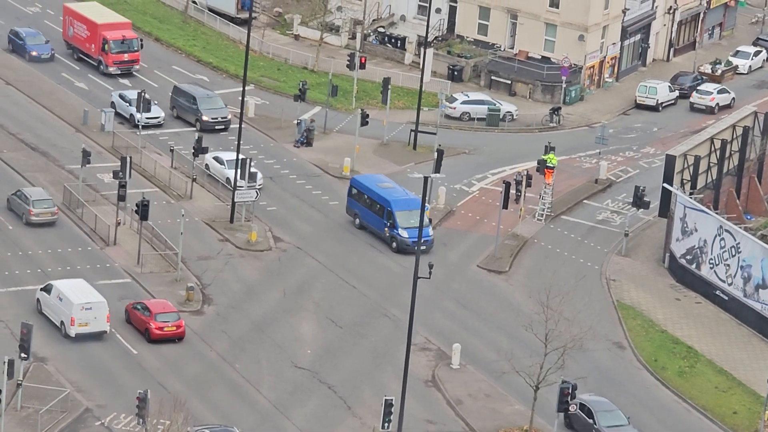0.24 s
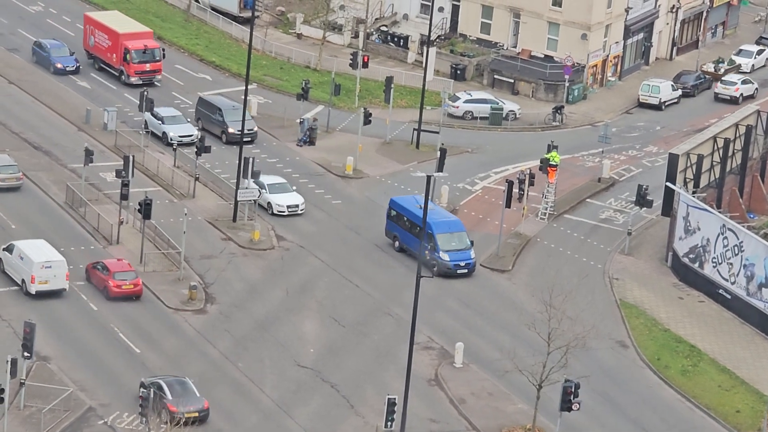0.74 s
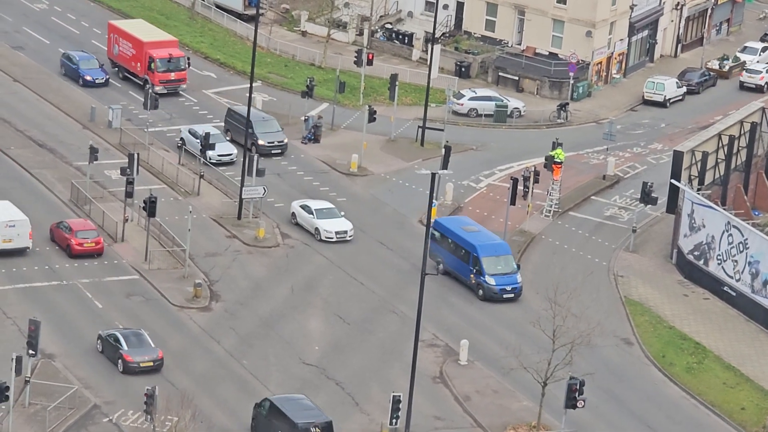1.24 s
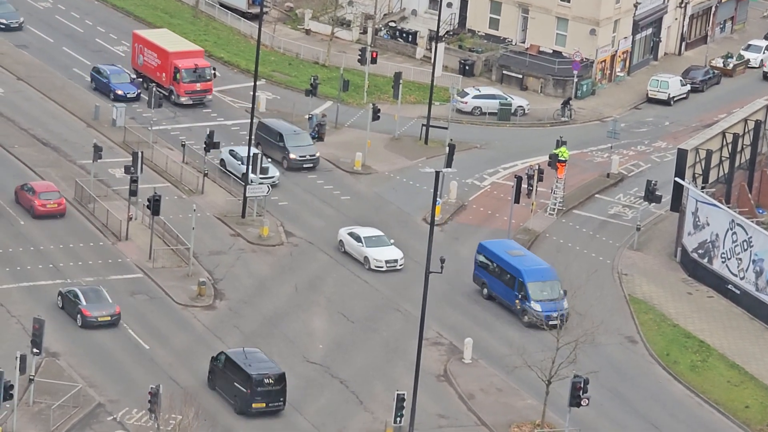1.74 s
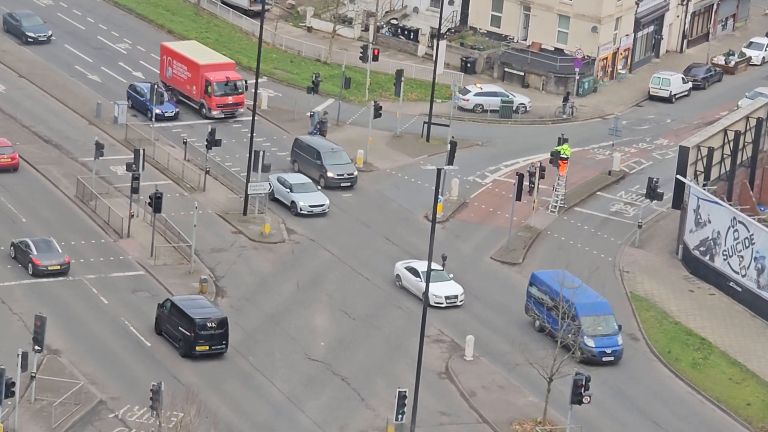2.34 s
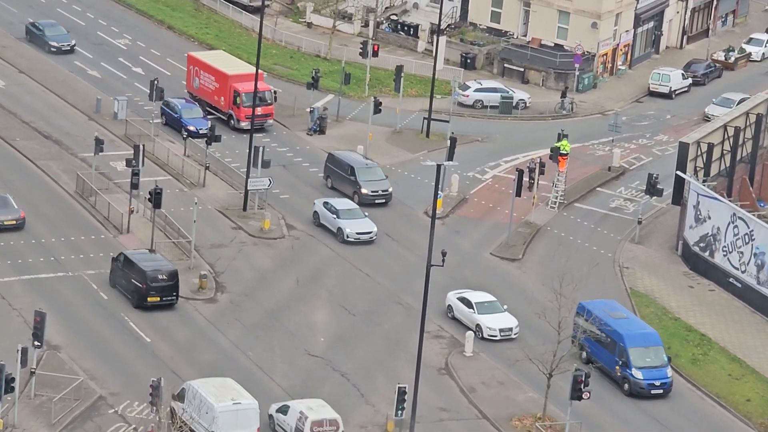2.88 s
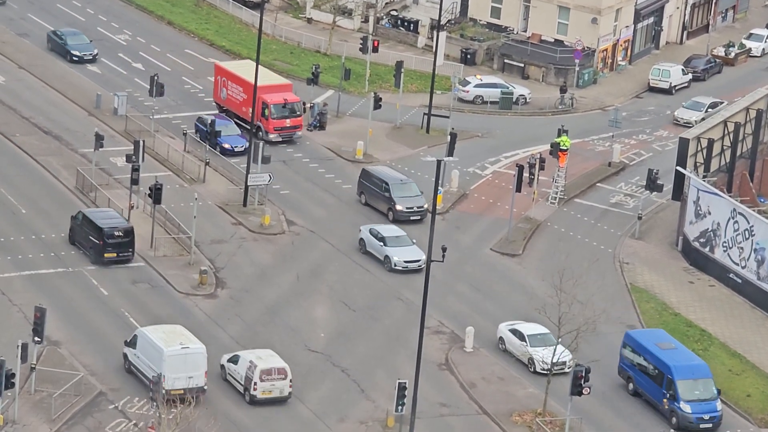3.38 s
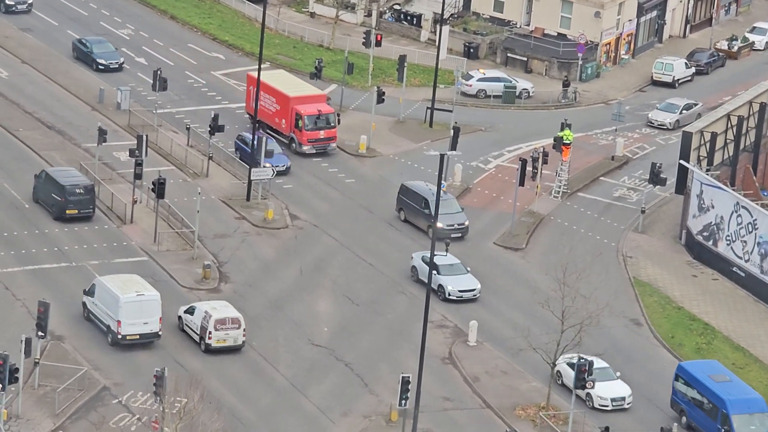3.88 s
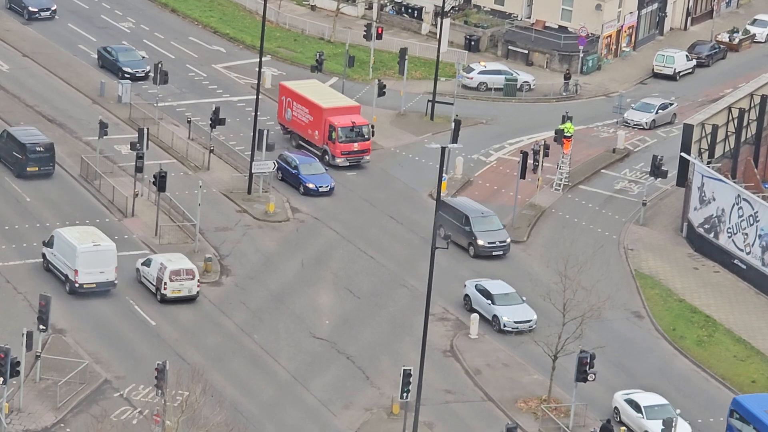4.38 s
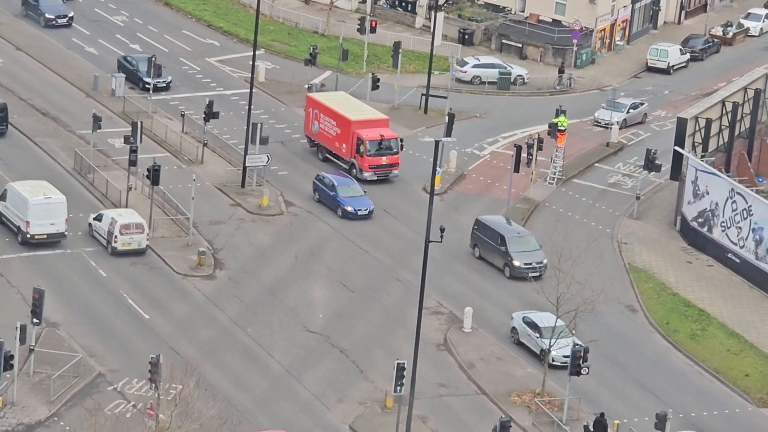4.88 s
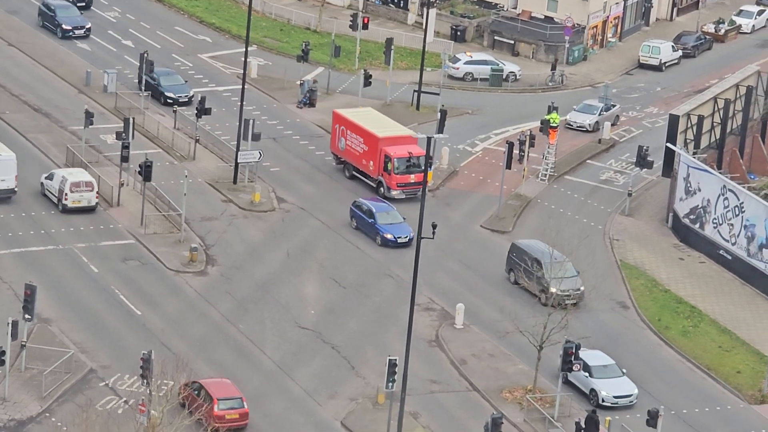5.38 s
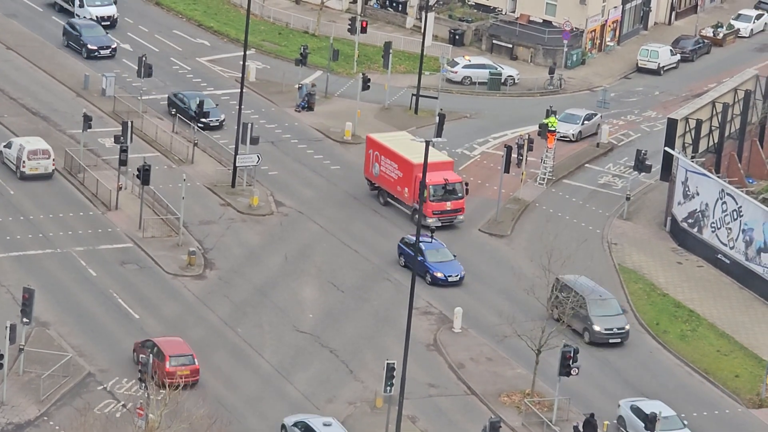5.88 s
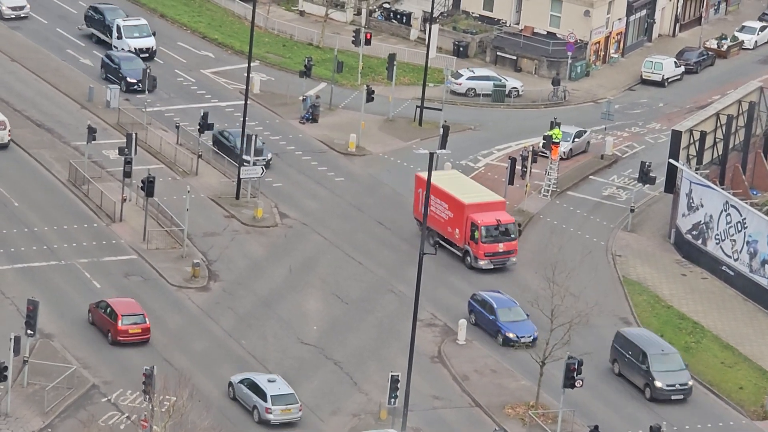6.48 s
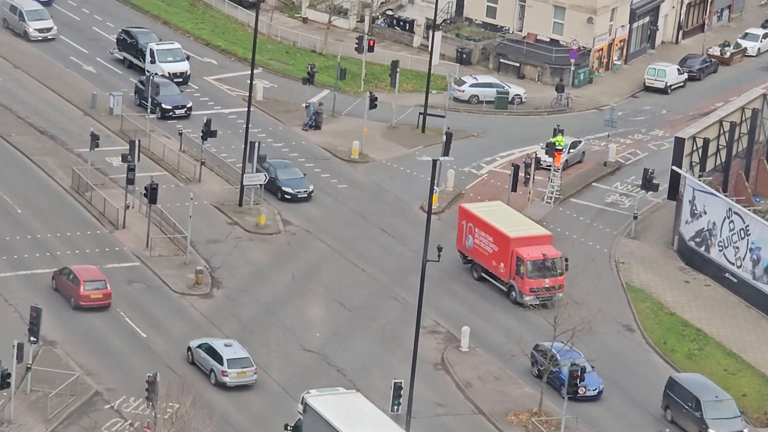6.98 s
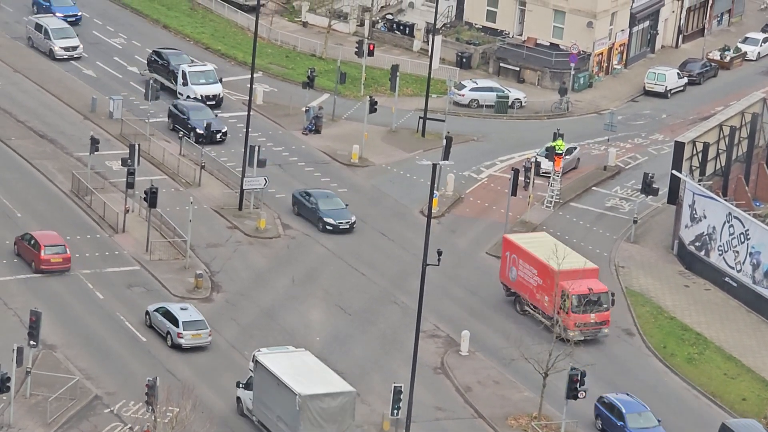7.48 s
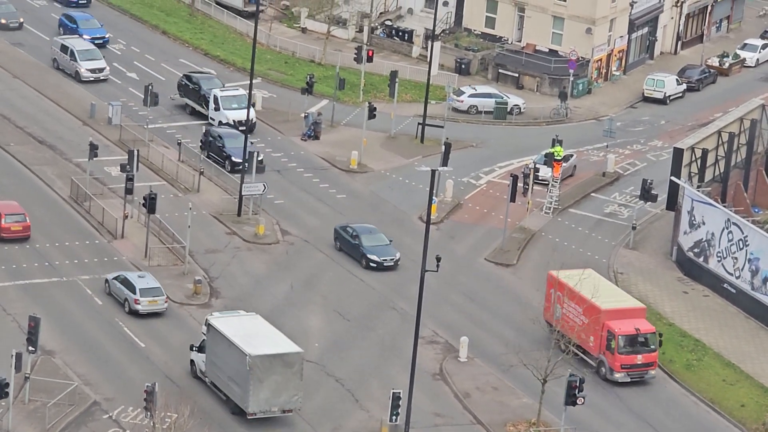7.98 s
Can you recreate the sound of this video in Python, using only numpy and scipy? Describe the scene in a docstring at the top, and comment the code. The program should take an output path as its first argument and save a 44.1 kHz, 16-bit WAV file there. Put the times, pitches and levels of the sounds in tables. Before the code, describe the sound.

Heard through a high window, deep road roar rises and falls, a lorry pulls away, and a sharp click sounds inside the room.

```python
"""Traffic on a busy junction, taken from a room high above it, by two microphones behind the window glass.
Tyre roar and exhaust rumble are noise bands that follow the flow; pane and room resonances colour them.
Engines are stacks of sines, wheels over road joints are decaying booms, and bands of noise swell up.
Indoors, short noise bursts ring small resonances as clicks and a faint tick about once a second;
the microphones add their hiss."""
import sys
import numpy as np
from scipy import signal
from scipy.fft import rfft, irfft, next_fast_len
from scipy.io import wavfile
from scipy.ndimage import uniform_filter1d

SR = 44100
rng = np.random.default_rng(int(sys.argv[2]) if len(sys.argv) > 2 else 0)


def attenuation_scalar(level_db):
    """Turn a level in dB into a linear amplitude multiplier (20 dB per decade)."""
    decades = np.asarray(level_db, float) / 20
    return 10 ** decades


def materialize(psi):
    """Save the field psi as 16-bit PCM at rate SR to the path in sys.argv[1].

    A 1-D psi becomes a single channel; in a 2-D psi each row is a channel.
    """
    bounded = np.clip(np.atleast_2d(psi).T, -1, 1)
    quanta = np.round(bounded * 32767).astype(np.int16)
    wavfile.write(sys.argv[1], SR, quanta)


N = 362943  # samples
SIZE = next_fast_len(N)
HZ = np.maximum(np.fft.rfftfreq(SIZE, 1 / SR), 1)
TIME = np.arange(N) / SR
STEP = 128  # samples between control values
SLOW = np.arange(N // STEP + 2) * STEP / SR  # control times in seconds

# Traffic flow. Each row: time in seconds, level of the low rumble in dB, how close and busy it is in dB.
FLOW = [(0, 1.5, -6.5), (.5, -1.5, -3.5), (.9, 0, -3.5), (1.4, -2, -2), (2.2, -0.5, 0), (3.0, -1, -1.5),
        (3.4, -1.5, 0), (3.75, 0, 1.5), (4.2, -0.5, 1), (4.8, 0, -1.5), (5.2, -2, 2), (5.7, -2.5, 1),
        (6.3, -0.5, 1), (6.7, 1, 2.5), (7.3, -1.5, -0.5), (7.599, -1.5, -0.5), (8.0, -4, -1.5),
        (8.2, 2, 2.5)]
# Stretches of the street noise: exhaust rumble, body drone, tyre roar, tyre hiss. One value each:
# centre in Hz.
STRETCH_HZ = [60, 400, 1200, 3200]
# mean level in dB, before the flow, swell and flicker.
STRETCH_DB = [-36.5, -43.5, -47.5, -62]
# dB gained per dB of rumble.
RUMBLE_SHARE = [1, 0, 0, 0]
# dB gained per dB of flow.
FLOW_SHARE = [0.11, 0.8, 0.26, 0.6]
# depth of the slow random swell in dB.
SWELL_DB = [0.99, 0.39, 1, 0.24]
# depth of the quick random unevenness in dB.
FLICKER_DB = [2.4, 1.4, 1.1, 1.5]
# Spectrum of the street behind the glass. Each row: frequency in Hz, relative density in dB per Hz.
STREET_SPECTRUM = [(15, -27.5), (25, -18.5), (40, -7), (60, -4.5), (100, -12.5), (180, -17), (300, -17.5),
                   (500, -18.5), (800, -24.5), (1300, -30.5), (2100, -39.5), (3200, -51.5), (4500, -63.5),
                   (5500, -74), (8000, -94.5)]
# Pane and room resonances and notches. Each row: frequency in Hz, width in Hz, height in dB.
WINDOW_MODES = [(135, 9.9, 3), (170, 1.9, -1), (226.8, 13, 4.5), (265.7, 46, 10.5), (328.7, 72.4, -13),
                (535, 95, 6.5), (626, 78, -6), (925, 68, -7), (984.4, 94, 9), (1244, 100, -6.5),
                (1358, 150, 6), (2000, 30, 5), (2181, 89, 7.5), (2226, 43, -5.5), (2900, 97, -6.5),
                (2830, 45, 10.5), (3050, 260, 7), (3390, 48, 8), (4320, 80, 8.5)]
# Likeness of the street at the two microphones. Each row: frequency in Hz, likeness from 0 to 1.
LIKENESS = [(30, 0.84), (110, 1), (200, 0.93), (360, 0.95), (660, 0.7), (1200, 0.1), (2200, 0),
            (4000, 0.03)]

# A lorry pulls away, then lifts off. Each row: time in seconds, nominal firing tone in Hz, level in dB.
LORRY = [(5.12, 57.6, -46), (5.3, 63.1, -35.5), (5.5, 67.6, -33), (5.751, 74.4, -31), (6.101, 79.9, -32.5),
         (6.4, 84.2, -34), (6.52, 83, -35)]
# Tones of the lorry. Each row: multiple of the nominal firing tone, level against the first in dB.
LORRY_ORDERS = [(0.98, 0), (4 / 3, -11), (2, -12)]
# Other engines that hum out of the traffic. Each row: start in seconds, end in seconds,
# nominal firing tone at the start in Hz, the same at the end in Hz, level in dB.
CARS = [(0, .4, 54, 48, -41), (2.0, 2.5, 55, 46, -41), (5.25, 5.5, 50, 52, -38), (1.5, 1.95, 35, 39, -41),
        (4.1, 5.0, 43, 53, -38.5), (7.3, 8.23, 50, 48, -36.5), (1.15, 1.5, 64, 73, -41),
        (1.05, 2.1, 126, 128, -44.5), (2.2, 3.0, 128, 127, -47), (1.15, 2.0, 51, 53, -41),
        (1.55, 2.3, 88, 83, -41), (3.35, 3.7, 69, 76, -40), (3.0, 3.6, 92, 91, -46),
        (3.1, 3.9, 128, 130, -45.5), (4.2, 5.0, 74, 80, -43), (4.1, 4.7, 134, 136, -49),
        (4.75, 5.5, 132, 130, -46.5), (5.7, 6.5, 131, 128, -50), (7.2, 8.23, 118, 127, -49),
        (7.6, 8.23, 84, 88, -41), (7.5, 8.23, 203, 210, -55)]
# A faint brake whine. Each row: time in seconds, frequency in Hz, level in dB.
BRAKE_WHINE = [(4.93, 3140, -79), (5.06, 3090, -75), (5.2, 3010, -74), (5.3, 3000, -80)]

# Heavy wheels over road joints. Each row: time in seconds, peak level in dB, frequency in Hz.
THUDS = [(2.801, -27, 60.8), (2.968, -23.5, 61.4), (3.212, -22, 64.8), (3.831, -23, 57.5),
         (5.379, -27.5, 61), (7.051, -23.5, 71.6)]
# Tones of one dull knock. Each row: frequency in Hz, relative level in dB, rise in seconds, fall in seconds.
KNOCK_MODES = [(275, -3, .006, .028), (545, 1.5, .007, .02), (1250, -18, .005, .001)]
# Bands of noise, narrow or broad: lower body of ticks and clicks, swells in the street roar, faint hiss.
# Each row: middle in seconds, half length in seconds, level in dB, frequency in Hz, width in Hz.
NOISE_BANDS = [(4.668, .02, -57, 2050, 500), (4.662, .025, -71, 3250, 500), (.41, .04, -60, 1500, 900),
               (2.52, .03, -64, 1900, 900), (5.15, .27, -75, 3050, 160), (3.0, .35, -58, 1000, 70),
               (7.6, .35, -72, 3050, 280), (1.41, .05, -83, 4500, 400), (3.8, .45, -51.5, 670, 90),
               (6.3, .5, -52, 650, 110), (6.95, .13, -50, 545, 40), (1.9, .5, -57, 690, 80),
               (3.65, .2, -52, 545, 40), (6.0, .4, -52, 535, 50)]
# Short squeaks. Each row: middle in seconds, half length in seconds, frequency in Hz,
# level in dB, level of the octave above in dB.
SQUEAKS = [(4.664, .010, 1690, -46, -69), (8.133, .003, 2950, -60, -90)]

# Indoor clicks. Each row: start in seconds, peak level in dB, brightness in dB per octave,
# decay time in seconds, left minus right in dB.
CLICKS = [(2.495, -56, -4.5, 0.05, -2), (3.195, -64, -6, 0.003, -2), (4.645, -58, -6.5, .05, 0),
          (5.216, -67, -5, 0.003, 0), (6.5912, -38, -8, 0.0022, 1.5), (8.177, -56, 4, 0.0073, -3)]
# What the clicks ring. Each row: frequency in Hz, width in Hz, level in dB.
CLICK_MODES = [(2200, 350, -3), (2900, 600, -3), (3680, 220, 7), (4300, 500, 1), (5600, 600, -2),
               (7300, 900, -5), (9600, 600, 0), (11400, 200, -2), (12700, 1000, -8), (14800, 2000, -9)]
# Faint ticks. Each row: start in seconds, peak level in dB, brightness in dB per octave, decay time in seconds.
TICKS = [(.382, -59, -7.5, .065), (1.385, -63, -7.5, 0.05), (3.371, -54, -4, 0.004), (4.387, -64, -6, .04),
         (5.387, -62, -6, .05), (6.3966, -46, -14, 0.006), (7.36, -63, -6, 0.14)]
# What the ticks ring. Each row: frequency in Hz, width in Hz, level in dB.
TICK_MODES = [(2100, 600, -2), (3000, 400, 6), (4000, 510, 1), (5200, 910, 0), (7000, 1200, -4),
              (8600, 400, -6), (11600, 700, -10)]
# Spectrum of the microphone self-noise. Each row: frequency in Hz, relative density in dB per Hz.
HISS_SPECTRUM = [(3000, -7), (5000, 0.5), (7000, -1), (8300, -5.5), (9400, -9.5), (10400, -14), (11400, -2),
                 (13000, -9), (15600, 1), (17000, -0.5)]


def along(hz, table):
    """Read a (Hz, value) table on a log-frequency axis."""
    table_hz, value = np.transpose(table)
    return np.interp(np.log(hz), np.log(table_hz), value)


def bell(hz, width):
    """Bell-shaped curve over frequency, 1 at its centre."""
    return 1 / (1 + (2 * (HZ - hz) / width) ** 2)


def noise(gain):
    """White noise through a gain per frequency bin."""
    return irfft(rfft(rng.standard_normal(SIZE)) * gain, SIZE)[:N]


def unit(x):
    """Scale to rms 1."""
    return x / np.sqrt(np.mean(x ** 2))


def walk(rate):
    """Random levels held 1 / rate s and slewed twice, at the control times; spread near 1."""
    k = int(SR / STEP / rate)
    held = np.repeat(rng.standard_normal(len(SLOW) // k + 1), k)
    return 1.36 * uniform_filter1d(uniform_filter1d(held, k), k)[:len(SLOW)]


def place(x, pan_db):
    """Set a sound between left and right; pan_db is left minus right."""
    return x * attenuation_scalar(np.array([[pan_db], [-pan_db]]) / 2)


def swell_shape(s, half):
    """Flat-topped swell around s seconds."""
    return np.exp(-((TIME - s) / half) ** 4)


def traffic():
    """Half-octave bands of street noise follow the flow, each with its own flicker."""
    pair = street_spectra()
    octave = np.log2(HZ)
    stretch_octave = np.log2(STRETCH_HZ)
    borders = np.sqrt(np.multiply(STRETCH_HZ[1:], STRETCH_HZ[:-1]))
    edges = np.log2([1, *borders, SR])
    power = [np.sum(np.abs(pair[:, (octave > low) & (octave < high)]) ** 2) / SIZE ** 2
             for low, high in zip(edges, edges[1:])]
    gains_db = np.array(STRETCH_DB) - 10 * np.log10(power)
    s, rumble, flow = np.transpose(FLOW)
    rumble_db = np.interp(SLOW, s, rumble)
    flow_db = np.interp(SLOW, s, flow)
    swell = walk(3.2)
    out = 0
    for centre in np.arange(4, 13.1, .5):
        def here(values):
            return np.interp(centre, stretch_octave, values)
        level_db = here(gains_db) + here(RUMBLE_SHARE) * rumble_db + here(FLOW_SHARE) * flow_db
        level_db += here(SWELL_DB) * swell + here(FLICKER_DB) * walk(7)
        gain = np.interp(TIME, SLOW, attenuation_scalar(level_db))
        band = np.cos(np.pi * np.clip(octave - centre, -.5, .5)) ** 2
        out = out + gain * irfft(pair * band, SIZE)[:, :N]
    return out


def street_spectra():
    """Steady noise spectra coloured by street, pane and room; the microphones agree mostly in the bass."""
    window_db = sum(db * bell(hz, width) for hz, width, db in WINDOW_MODES)
    colour = attenuation_scalar(along(HZ, STREET_SPECTRUM) + window_db)
    like = np.clip(along(HZ, LIKENESS), 0, 1)
    mid = rfft(rng.standard_normal(SIZE)) * np.sqrt(1 + like)
    side = rfft(rng.standard_normal(SIZE)) * np.sqrt(1 - like)
    lag = np.exp(1j * np.pi * HZ * .00012)  # the left microphone hears the street 0.12 ms earlier
    return colour * walls() * np.array([(mid + side) * lag, (mid - side) / lag])


def walls():
    """Nearby walls add a spray of echoes to the direct path: a fine ripple on each microphone's spectrum."""
    t60_s, echo_db = 0.44, -22.5
    echoes = rng.standard_normal((2, 8192)) * attenuation_scalar(-60 * TIME[:8192] / t60_s)
    echoes /= np.sqrt(np.sum(echoes ** 2, axis=1, keepdims=True))
    return 1 + attenuation_scalar(echo_db) * rfft(echoes, SIZE)


def engine(s, hz, db, orders, waver, throb_db, fade_s, opening_db=0):
    """Firing tone and overtones on an unsteady speed (waver, a share) and load, fading in and out."""
    heard = slice(max(int((s[0] - fade_s) * SR), 0), int((s[-1] + fade_s) * SR))
    t = TIME[heard]
    fade = np.clip((np.minimum(t - s[0], s[-1] - t) / fade_s + 1) / 2, 0, 1)
    speed = np.interp(t, s, hz)
    unsteady = speed * (1 + waver * np.interp(t, SLOW, walk(12)))
    turns = np.cumsum(unsteady) / SR + rng.random()
    # overtones come up by opening_db per octave of speed
    opened_db = opening_db * np.log2(speed / hz[-1])
    tones = sum(attenuation_scalar(rel_db + (k > 1) * opened_db) * np.sin(2 * np.pi * k * turns) for k, rel_db in orders)
    load_db = np.interp(t, s, db) + throb_db * np.interp(t, SLOW, walk(11))
    out = np.zeros(N)
    out[heard] = np.sqrt(2) * fade * attenuation_scalar(load_db) * tones
    return out


def lorry():
    """A lorry's firing tone climbs as it pulls away and sags as it lifts off."""
    return engine(*np.transpose(LORRY), LORRY_ORDERS, waver=.007, throb_db=1.8, fade_s=.12, opening_db=32)


def cars():
    """Single engine hums, each one sine gliding in pitch at 0.98 of its nominal firing tone."""
    return sum(engine((start, end), (hz_a, hz_b), (db, db), [(0.98, 0.00067)], waver=.015, throb_db=3, fade_s=.15)
               for start, end, hz_a, hz_b, db in CARS)


def brake_whine():
    """A faint, unsteady high sine that glides down."""
    return engine(*np.transpose(BRAKE_WHINE), [(1, 0)], waver=.008, throb_db=4, fade_s=.05)


def jolt(s, db, hz, rise, fall):
    """A tone that swells and rings out."""
    out = np.zeros(N)
    heard = slice(int((s - .3) * SR), int((s + .6) * SR))
    t = TIME[heard] - s
    envelope = np.exp(-np.where(t < 0, (t / rise) ** 2, t / fall))
    out[heard] = attenuation_scalar(db) * envelope * np.cos(2 * np.pi * hz * t)
    return out


def thuds():
    """Heavy wheels over road joints: low booms of one decaying tone each."""
    return sum(jolt(s, db, hz, rise=.058, fall=.077) for s, db, hz in THUDS)


def knock():
    """One dull knock: three short tones swell and decay together."""
    start_s, level_db = 7.402, -27.5
    return sum(jolt(start_s, level_db + db, hz, rise, fall) for hz, db, rise, fall in KNOCK_MODES)


def noise_bands():
    """Bands of noise, narrow or broad, that swell and fade."""
    return sum(attenuation_scalar(db) * swell_shape(s, half) * unit(noise(bell(hz, width)))
               for s, half, db, hz, width in NOISE_BANDS)


def squeaks():
    """Brief steady tones, each with its octave."""
    out = np.zeros(N)
    for s, half, hz, db, octave_db in SQUEAKS:
        turn = 2 * np.pi * hz * TIME
        out += swell_shape(s, half) * (attenuation_scalar(db) * np.sin(turn) + attenuation_scalar(octave_db) * np.sin(2 * turn))
    return out


def clicks(events, modes, room_db):
    """Short bursts ring small hard parts; the room adds a brief diffuse tail, different at each microphone."""
    room_t60_s = .22
    rise_share = .084  # a burst swells over this share of its decay time
    blow_db = 13  # first hard contact over the rattle
    grain_db, grain_s = 3.5, .0015  # unevenness of the rattle
    # the right microphone faces the room and hears it brighter, by 2.5 dB per octave
    facing_db = 2.5 * np.array([[-.5], [.5]])
    out = np.zeros((2, N))
    t = np.arange(8192) / SR
    f = np.fft.rfftfreq(len(t), 1 / SR)
    # two-pole resonances, so that nothing rings before the blow
    body = sum(attenuation_scalar(db) * 1j * f * width / (hz ** 2 - f ** 2 + 1j * f * width) * (-1) ** k
               for k, (hz, width, db) in enumerate(modes))
    for s, db, tilt_db, decay, pan_db in events:
        burst = rng.standard_normal((2, len(t))) * np.exp(-t / decay) * np.tanh(t / (rise_share * decay))
        grains = rng.standard_normal(len(t))[(t / grain_s).astype(int)]
        burst *= attenuation_scalar(grain_db * grains)
        burst[:, 0] = attenuation_scalar(blow_db) * np.exp(-decay / .0079)  # the short ones begin with one hard blow
        tail = rng.standard_normal((2, len(t))) * attenuation_scalar(room_db - 60 * t / room_t60_s)
        tilt = ((1200 + 1j * f) / 6000) ** ((tilt_db + facing_db) / (20 * np.log10(2)))
        sound = irfft(rfft(burst + tail) * body * tilt, len(t))
        sound *= np.minimum((t[-1] - t) / .03, 1)  # fade the end
        sound *= attenuation_scalar(db) / np.abs(sound).max(axis=1, keepdims=True)
        start = int(s * SR)
        out[:, start:start + len(t)] += place(sound, pan_db)[:, :N - start]
    return out


def ticks():
    """Faint ticks: the same kind of burst, farther off and so with more room, a little to the right."""
    events = [(*row, -2.5) for row in TICKS]
    return clicks(events, TICK_MODES, room_db=-13)


def hiss():
    """Self-noise of the two microphones: independent shaped noise."""
    return attenuation_scalar(-85.5) * np.array([unit(noise(attenuation_scalar(along(HZ, HISS_SPECTRUM)))) for _ in range(2)])


def scene():
    """The street and noise bands, slightly to the left, plus the room's own clicks and ticks."""
    engines = lorry() + brake_whine() + cars()
    street = traffic() + engines + thuds() + knock() + noise_bands() + squeaks()
    return place(street, 1.43) + clicks(CLICKS, CLICK_MODES, room_db=-20) + ticks()


def top_cut(x):
    """Nothing passes above the cut-off."""
    return signal.sosfilt(signal.butter(12, 15720, fs=SR, output="sos"), x)


def record(dry):
    """The microphones add their own faint hiss to what reaches them."""
    mix = dry + hiss()
    return top_cut(mix)


dry = scene()
out = record(dry)
materialize(out)
```